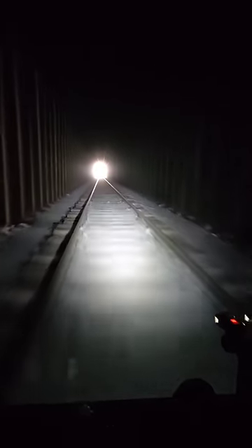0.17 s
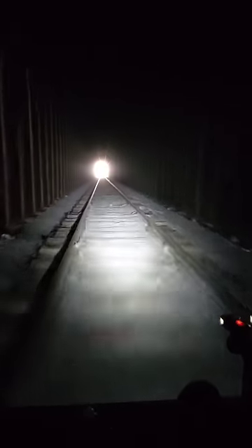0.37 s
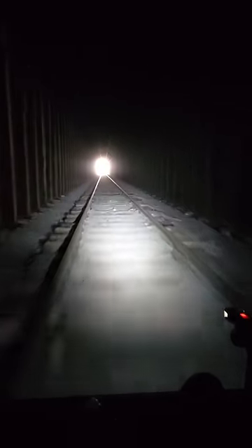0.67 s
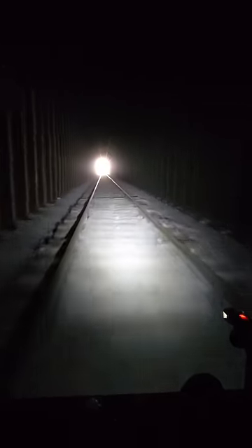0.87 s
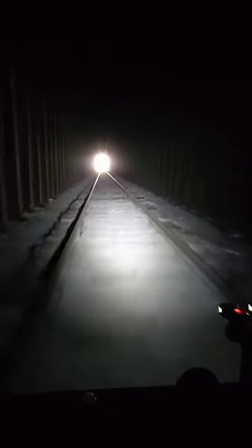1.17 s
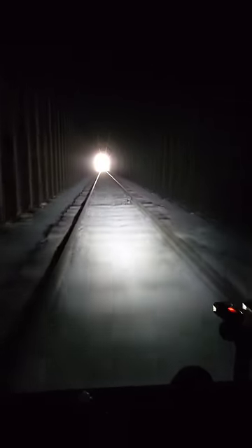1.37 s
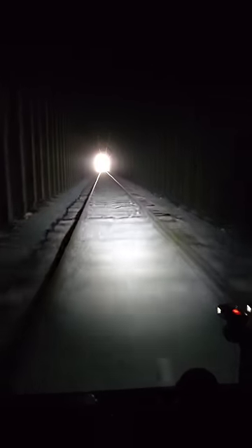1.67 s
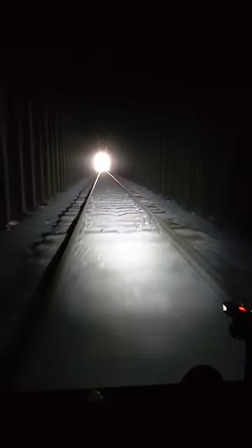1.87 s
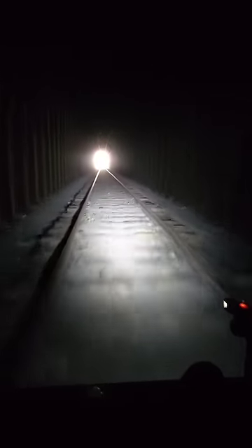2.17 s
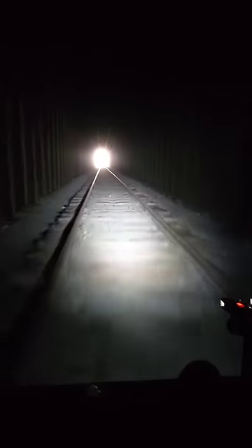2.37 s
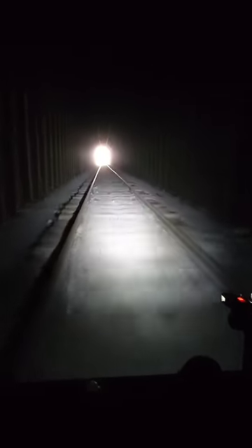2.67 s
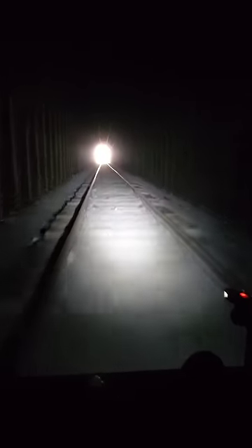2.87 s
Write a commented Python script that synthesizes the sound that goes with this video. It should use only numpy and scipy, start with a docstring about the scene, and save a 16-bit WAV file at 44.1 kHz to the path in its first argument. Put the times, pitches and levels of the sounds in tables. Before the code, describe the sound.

A small motorized rail cart rolls through a tunnel, heard from on board: pulsing steel-wheel roar, low uneven engine putter, and constant metal clacks, knocks and jingling rattle to the right, with brief hard echo.

```python
"""Rail cart in a tunnel

A small rail cart runs through a tunnel: uneven engine puffs ring an exhaust under a roar of steel wheels,
made of shaped noise that swells once a turn. To the right a loose metal piece hops: its modes ring while
it is in the air and are damped as it lands. The frame clacks, knocks and chatters in struck modes and grit,
low jolts thump through the chassis, and dying taps give the metal its tunnel echo. Wind flutters faintly.
"""
import sys
import numpy as np
from scipy import signal
from scipy.io import wavfile
from scipy.ndimage import uniform_filter1d

SR = 44100
rng = np.random.default_rng(int(sys.argv[2]) if len(sys.argv) > 2 else 0)


def put_to_file(sound):
    """Save the sound as 16-bit audio at rate SR, in the file named by the first command-line argument."""
    columns = np.atleast_2d(sound).T  # one column per channel
    safe = np.clip(columns, -1, 1)
    whole_steps = np.round(safe * 32767)
    wavfile.write(sys.argv[1], SR, whole_steps.astype(np.int16))


N = 133623

# Spectrum of the wheel roar, relative: [f/Hz, level per Hz/dB]
ROAR_SPECTRUM = [(15, -68), (25, -38), (59, -53), (99, -23), (141, 3.5), (326, -1), (476, -8.5), (624, -6),
                 (1160, -10.5), (2000, -9), (2910, -18.5), (3720, -21), (5000, -29), (8140, -28.5),
                 (10300, -39), (12200, -36.5), (14400, -30), (16000, -34)]
# Course of the roar above the rumble: [t/s, level/dB]
ROAR_LEVEL = [(0, -20), (.25, -20), (.5, -17), (.75, -18.5), (.95, -19.5), (1.1, -18.5), (1.3, -19.5),
              (1.5, -17.5), (1.75, -20), (1.95, -15.5), (2.1, -18.5), (2.3, -17), (2.55, -17), (2.75, -19),
              (3.03, -15)]
# Course of the low rumble, used relative to its loudest point: [t/s, level/dB]
RUMBLE_LEVEL = [(0, -22.5), (.3, -24.5), (.65, -21.5), (.9, -23), (1.2, -23), (1.6, -21), (1.9, -22),
                (2.05, -18.5), (2.25, -21), (2.4, -22), (2.75, -22.5), (3.03, -20.5)]
# Resonances the wheels add to the roar: [f/Hz, width/Hz, level/dB]
WHEEL_RING = [(611.4, 43, 1.5), (340.8, 10, -5)]
# Height of the swell once a wheel turn: [f/Hz, level/dB]
TURN_SWELL = [(100, -10.5), (300, 0.5), (700, 3), (2000, 4), (6000, 4), (12000, 0)]
# Likeness of the roar in the two ears: [f/Hz, correlation/share]
EAR_LIKENESS = [(60, .7), (120, .93), (300, .86), (700, .66), (1500, .45), (3000, .3), (6000, .2),
                (15000, .1)]
# Balance of the roar, left over right: [f/Hz, level/dB]
ROAR_BALANCE = [(60, -9), (110, 4), (200, 1), (380, 1), (700, -0.5), (1290, -1), (2380, -9), (4400, -3),
                (8120, -4), (15000, 4.5)]
# Band of the wind flutter: [low edge and high edge f/Hz]
WIND_BAND_HZ = [30, 95]
# Modes of the chattering frame: [f/Hz, level/dB, t60/s]
FRAME_MODES = [(1535, -6, .025), (1990, 0, .035), (2280, -3, .03), (2680, -6, .03), (3160, -4, .035),
               (3750, -1, .03), (4220, -3, .03), (4680, -11, .025), (5350, -17, .02), (6650, -14, .025),
               (7300, -18, .015), (8000, -10, .03), (9450, -16, .035)]
# How hard the frame chatters, relative: [t/s, level/dB]
CHATTER_COURSE = [(0, -5), (.17, -8), (.22, -1), (.31, -9), (.55, -4), (.61, 4), (.68, 1), (.72, -8),
                  (.93, -1), (.99, -10), (1.06, 3), (1.14, -8), (1.4, -1), (1.56, -11), (1.62, 1),
                  (1.77, -5), (1.81, 7), (1.9, 5), (1.93, -5), (2.07, -1), (2.3, -5), (2.44, 3), (2.5, -4),
                  (2.58, 1), (2.65, -8), (3.03, -2)]
# Exhaust resonances, each passed twice, the second time twice as wide: [f/Hz, width/Hz, level/dB]
EXHAUST = [(123.5, 9, 27), (143, 53, 0), (227, 31, 2), (264, 130, -4)]
# Course of the engine under load: [t/s, level/dB]
ENGINE_LEVEL = [(0, -30), (.4, -28.5), (.8, -26), (1.2, -25.5), (1.6, -30.5), (2, -20), (2.3, -17.5),
                (2.7, -26.5), (3.03, -20)]
# Clacks of the frame: [t/s, level/dB, f/Hz, bright ring level/dB, crack level/dB]
CLACKS = [(0.0433, -20, 3810, -10, -25), (0.375, -24, 3820, -1, -18), (0.5898, -18, 3750, -20, -2),
          (0.8086, -18, 3700, -3, -1), (0.8672, -10, 4140, -12, -14), (0.8745, -23, 4150, -15, -12),
          (0.915, -19, 4140, -20, -12), (0.9236, -22, 3700, -4, -13), (1.07, -31, 3700, -15, -5),
          (1.1784, -16.5, 3660, -1, 3.5), (1.2087, -22, 3700, -8, -3), (1.2492, -13, 3870, -7, -10),
          (1.3533, -15.5, 3710, -6, -6.5), (1.4092, -25, 3880, -40, -16), (1.4606, -19.5, 3680, -24, -11),
          (1.5209, -20.5, 3750, -4, 3), (1.6202, -18, 3730, -14, 1), (1.6826, -19, 3740, -8, -14),
          (1.767, -24, 3830, -14, -18), (1.8076, -19, 3750, -10, -1), (1.801, -30, 3600, -14, -6),
          (1.8385, -18, 3680, -14, -7), (1.86, -13.5, 4205, -16, -5), (1.8715, -24, 3750, -5, 6),
          (1.953, -15.5, 3860, -4, -19), (2.0076, -17, 3700, -4, -17), (2.1146, -11.5, 3790, -12, -24),
          (2.161, -15, 3640, 1.5, 1), (2.2204, -22.5, 3580, -16, 2), (2.3416, -16, 3900, -22, -19),
          (2.4533, -21, 3640, -12, -16), (2.4974, -15.5, 3870, -10, -16), (2.55, -17.5, 3640, 3, -15),
          (2.6054, -13.5, 3870, -10, -12), (2.6814, -19, 3640, -20, 6.5), (2.7706, -26, 3850, -13, -9),
          (2.8035, -21.5, 3830, -16, -16), (2.83, -12, 3820, -14, -3.5)]
# Close modes within a clack: [pitch/ratio, level/dB]
CLACK_CLUSTER = [(1, -1), (.965, -7), (1.04, -8), (1.11, -11)]
# Hops of the loose piece: [t/s, level/dB, time in the air/s, low modes level/dB, top modes level/dB]
HOPS = [(0.1898, -31.5, 0.02, 15, -28), (0.2387, -34, 0.088, 4, -20), (0.3271, -30, 0.034, 10, -9),
        (0.376, -34, 0.029, -15, -30), (0.4883, -28.5, 0.084, 8, -11), (0.5881, -29, 0.06, 2, -12),
        (0.638, -31, 0.022, -1, 1), (0.7871, -29.5, 0.032, -9, -17), (0.8657, -20, 0.022, 5, -7),
        (0.8905, -22, 0.036, -4, -4), (0.9245, -27.5, 0.0088, 0, -6), (1.0277, -31.5, 0.069, 11, -14),
        (1.076, -28.5, 0.014, 8, -12), (1.2597, -26.5, 0.03, 13, -3), (1.3533, -30.5, 0.02, -8, -6),
        (1.3848, -37, 0.035, 2, -1), (1.489, -32, 0.048, 14, -19), (1.5204, -34, 0.025, -19, 6),
        (1.59, -28.5, 0.033, 15.5, -6), (1.6816, -32, 0.063, -15, -14), (1.7135, -31.5, 0.052, 9, -15),
        (1.7926, -40, 0.066, 1, -12), (1.8087, -23, 0.018, 10, -3), (1.8275, -26, 0.02, 8, -8),
        (1.847, -27, 0.022, 9, -5), (1.8715, -27, 0.036, 1, -4), (1.954, -25, 0.021, 8, -1),
        (2.0294, -32, 0.03, 0, -11), (2.161, -28, 0.021, -19, -3), (2.372, -32.5, 0.072, 9, 0),
        (2.5347, -19.5, 0.015, 14, -5), (2.5516, -23.5, 0.015, -13, 1), (2.601, -25.5, 0.024, 12, -1),
        (2.7011, -19.5, 0.06, 10, -2), (2.8, -34, 0.04, 6, 0), (3.007, -28, 0.04, -22, -14)]
# Pitches of the loose piece's modes: [f/Hz]
PIECE_HZ = [3152, 4116, 4236, 5257, 5755, 6527, 6694, 7910, 8090, 9393, 10982, 11225, 4712]
# The same modes in order: [level/dB, t60/s, left over right/dB, group: 0 low, 1 middle, 2 top]
PIECE_MODES = [(-11, .08, -6, 0), (-6, .15, -8, 0), (-3, .1, -8, 0), (-12, .12, -4, 0), (-19, .15, -4, 0),
               (-7, .12, -2, 1), (-5, .18, -3, 1), (4, .6, -11, 1), (-6, .08, -4, 1), (0, .6, -11, 2),
               (-13, .4, -6, 2), (-13, .4, -6, 2), (-13, .1, -5, 0)]
# Dull knocks on the frame: [t/s, level/dB, f/Hz]
KNOCKS = [(0.256, -10, 1960), (0.3735, -12, 2100), (0.4743, -15.5, 2130), (0.602, -11, 1990),
          (0.6674, -15, 2030), (1.2476, -10, 2014), (1.3897, -11, 2025), (1.4132, -11.5, 2150),
          (1.4697, -9, 1955), (1.6315, -23, 2230), (1.6794, -11, 2020), (1.8821, -18, 2200),
          (1.8978, -28, 2220), (2.0098, -24, 1990), (1.908, -17, 2320), (2.3346, -12.5, 2040),
          (2.4, -14, 2060), (2.4407, -13, 1930), (2.4532, -13, 2480), (2.4948, -10, 2150),
          (2.541, -11.5, 2280), (2.9542, -25, 2110), (2.985, -11, 1930)]
# Jolts through the chassis: [t/s, level/dB, f/Hz]
THUMPS = [(0.445, -8.5, 345.6), (0.573, -14, 171), (0.681, -1.5, 140), (1.015, -9, 343), (1.399, -6.5, 156),
          (1.512, -4, 136), (1.735, -13, 150), (1.959, -7, 348.6), (2.009, -4, 257), (2.095, -4, 143),
          (2.221, -4, 158), (2.256, -13, 135), (2.979, -3, 132)]

TURN_HZ, FIRST_SWELL_S, SWELL_PEAK_S = 9.16, 0.043, 0.0071
RUMBLE_TOP_HZ, HISS_LOW_HZ = 480, 10500
HISS_RISE_DB, HISS_FOLLOW = 6, .2  # the hiss grows over the ride; share of the roar's course it follows
WIND_START_DB, WIND_RISE_DB = -59.25, 9.5
CHATTER_DB, CHATTER_PAN_DB, TICK_DB = -28, -16.5, -4
CHATTER_PER_S, CHATTER_SPREAD_DB = 1000, 3.2  # contact rate before clumping; spread of their strength
DETUNE, SPOT_SPREAD_DB = .022, 2.5  # from spot to spot: pitch share, mode level
ENGINE_HZ, FIRST_FIRING_S = 9.51, .025  # engine cycles per second; moment of a strong puff before wobble
WOBBLE, OFFBEAT, OFFBEAT_DB = 0.004, 0.49, -7  # timing drift and weak puff's place in cycles; its level
CLACK_T60, BRIGHT_HZ, BRIGHT_T60, CRACK_S = .04, 8280, .018, .0028
CRACK_DB, CLACK_PAN_DB = 3, -11
PIECE_DB, STRIKE_DB, STRIKE_SPREAD_DB = -1, -6, 2.5  # ring trim, grit trim, mode level spread
FLICKER_DB, LANDING_S = 2.5, 0.0022  # flicker of the ring; decay time as it lands
TOUCH_RISE = .007  # pitch share gained at the strike
TOUCH_S, TOUCH_SPREAD = .01, .9  # median time of touching the frame; its log spread
KNOCK_DB, KNOCK_T60, KNOCK_PAN_DB = -4.5, 0.041, -19
KNOCK_GRIT_DB, KNOCK_GRIT_S = 2, .006
THUMP_DB, THUMP_RISE_S, THUMP_T60 = -7, 0.0058, 0.14
TUNNEL_T60, TUNNEL_DB = .22, -13
LEFT_LATE_S = 0.000282
MIC_LOW_HZ, EDGE_HZ, KNEE = 109, 15850, 1.3  # bass cut, top of the band, ceiling of the rounded peaks


def gain_of(db):
    """Turn decibels into an amplitude factor."""
    return 10 ** (np.asarray(db) / 20)


def evened(x):
    """Scale to an RMS of one."""
    return x / np.sqrt(np.mean(x ** 2) + 1e-20)


def read(points, hz):
    """Read a curve along a logarithmic pitch axis."""
    f, value = np.transpose(points)
    return np.interp(np.log(hz + 1), np.log(f + 1), value)


def course(points, t):
    """Read a course over time, straight between its points."""
    return np.interp(t, *np.transpose(points))


def add(mix, s, sound):
    """Lay a sound into the mix from second s, cut at the end."""
    part = mix[..., round(s * SR):][..., :sound.shape[-1]]
    part += sound[..., :part.shape[-1]]


def resonate(x, hz, width):
    """A steady resonance with a gain of about one at its centre."""
    turn = np.exp(2j * np.pi * hz * np.arange(len(x)) / SR)
    r = np.exp(-np.pi * width / SR)
    return 2 * (turn * signal.lfilter([1 - r], [1, -r], x / turn)).real


def ping(t, hz, t60, turn=0):
    """A struck mode: a sine dying by 60 dB in t60, its phase offset in turns."""
    return gain_of(-60 * t / t60) * np.sin(2 * np.pi * (hz * t + turn))


def grit(noise, length_s):
    """A short crack of mid and treble noise with a hollow near 6 kHz."""
    sos = signal.butter(4, [1200, 9000], "band", fs=SR, output="sos")
    hollow = noise - .6 * resonate(noise, 6100, 600)
    return signal.sosfilt(sos, hollow) * np.exp(-np.arange(len(noise)) / SR / length_s)


def placed(x, pan_db):
    """A source to the right: weaker and later on the left."""
    late = round(LEFT_LATE_S * SR)
    left = np.r_[np.zeros(late), x][:len(x)]
    return np.array([gain_of(pan_db / 2) * left, gain_of(-pan_db / 2) * x])


def roar():
    """Rolling noise in drifting patches that swells once each wheel turn."""
    frames, hz = N // 256 + 5, np.fft.rfftfreq(1024, 1 / SR)
    a, b, c, d, patches = rng.standard_normal((frames, 513, 5)).T
    patches = uniform_filter1d(patches, size=12, axis=0)  # across pitch
    patches = evened(uniform_filter1d(patches, size=7, axis=1))  # across time
    flicker = evened(uniform_filter1d(rng.standard_normal(frames), size=2))

    t = np.arange(frames) * 256 / SR
    since = ((t - FIRST_SWELL_S) * TURN_HZ % 1) / TURN_HZ / SWELL_PEAK_S
    swell = since * np.exp(1 - since)
    level, rumble = course(ROAR_LEVEL, t), course(RUMBLE_LEVEL, t)
    top = level.max()
    low = 1 / (1 + (hz / RUMBLE_TOP_HZ) ** 4)
    hiss = hz > HISS_LOW_HZ
    follow = np.where(hiss, HISS_FOLLOW, 1 - low)

    db = read(ROAR_SPECTRUM, hz)[:, None] + np.outer(read(TURN_SWELL, hz), swell)
    db += np.outer(follow, level - top) + np.outer(low, rumble - rumble.max())
    db += 1.3 * patches + 0.72 * flicker
    db += np.outer(hiss, HISS_RISE_DB * (t * SR / N - 1))

    # the right ear shares part of the left's noise, a little earlier
    same = np.clip(read(EAR_LIKENESS, hz), 0, 1)[:, None]
    left = a + 1j * b
    earlier = np.exp(2j * np.pi * hz * LEFT_LATE_S)[:, None]
    right = same * left * earlier + np.sqrt(1 - same ** 2) * (c + 1j * d)
    balance = gain_of(read(ROAR_BALANCE, hz) / 2)[:, None]
    spectrum = np.array([left * balance, right / balance]) * gain_of(db)
    x = signal.istft(spectrum, nperseg=1024, noverlap=768)[1][:, :N]
    ring = [sum(gain_of(g) * resonate(ear, f, w) for f, w, g in WHEEL_RING) for ear in x]
    return gain_of(top - 1.5) * evened(x + np.array(ring))


def wind():
    """A faint low flutter that grows, unrelated at the two microphone ports."""
    sos = signal.butter(2, WIND_BAND_HZ, "band", fs=SR, output="sos")
    flutter = evened(signal.sosfilt(sos, rng.standard_normal((2, N))))
    return gain_of(WIND_START_DB + WIND_RISE_DB * np.arange(N) / N) * flutter


def chatter():
    """Many tiny contacts, in clumps: each ticks and rings one of twelve slightly different frame spots."""
    shake = gain_of(course(CHATTER_COURSE, np.arange(N) / SR))
    clump = gain_of(3.0 * evened(uniform_filter1d(rng.standard_normal(N), size=700)))
    strength = gain_of(CHATTER_SPREAD_DB * np.minimum(rng.exponential(1, N), 3))
    contacts = strength * (rng.random(N) < CHATTER_PER_S * clump / SR)
    spot, t, x = rng.integers(0, 12, N), np.arange(2000) / SR, np.zeros(N)
    spot_draws = rng.standard_normal((12, len(FRAME_MODES), 2))
    for k, (draws, noise) in enumerate(zip(spot_draws, rng.standard_normal((12, 2000)))):
        sound = gain_of(TICK_DB) * grit(noise, 0.00098)
        for (hz, db, t60), (u, v) in zip(FRAME_MODES, draws):
            sound += gain_of(db + SPOT_SPREAD_DB * u) * ping(t, hz * (1 + DETUNE * v), t60)
        x += signal.oaconvolve(contacts * (spot == k), sound)[:N]
    return placed(gain_of(CHATTER_DB) * shake * evened(x), CHATTER_PAN_DB)


def engine():
    """One strong and one weak puff each cycle ring the exhaust."""
    t = np.arange(N) / SR
    drift = evened(uniform_filter1d(rng.standard_normal(N), size=4000))
    cycles = (t - FIRST_FIRING_S) * ENGINE_HZ + WOBBLE * drift
    puffs = np.zeros(N)
    for offset, gain in [(0, 1), (OFFBEAT, gain_of(OFFBEAT_DB))]:
        puffs += gain * (np.diff(np.floor(cycles - offset), prepend=-1) > 0)
    puffs = puffs * gain_of(2.5 * rng.standard_normal(N))  # uneven strength
    x = sum(gain_of(db) * resonate(resonate(puffs, f, w), f, 2 * w) for f, w, db in EXHAUST)
    return gain_of(course(ENGINE_LEVEL, t)) * evened(x)


def clacks():
    """A crack of noise, a short ring of close modes and a brighter, shorter one."""
    out, t = np.zeros(N), np.arange(3000) / SR
    noises = rng.standard_normal((len(CLACKS), 3000))
    for (s, db, hz, bright_db, crack_db), noise in zip(CLACKS, noises):
        modes = zip(CLACK_CLUSTER, noise[-4:])  # the last draws set the phases
        ring = sum(gain_of(g) * ping(t, hz * ratio, CLACK_T60, turn) for (ratio, g), turn in modes)
        bright = gain_of(bright_db) * ping(t, BRIGHT_HZ, BRIGHT_T60)
        crack = gain_of(crack_db + CRACK_DB) * grit(noise, CRACK_S)
        add(out, s, gain_of(db) * (np.minimum(t / 0.00087, 1) * ring + bright + crack))
    return placed(out, CLACK_PAN_DB)


def loose_piece():
    """Each hop strikes the modes anew: sharp until the piece lifts off, flickering, cut by the landing."""
    out, chance = np.zeros((2, N)), rng.standard_normal((len(HOPS), len(PIECE_MODES), 3))
    tremble = uniform_filter1d(rng.standard_normal((len(PIECE_MODES), N + SR)), size=110)
    tremble = gain_of(FLICKER_DB * evened(tremble))
    noises = rng.standard_normal((len(HOPS), 1500))
    for (s, db, air, low_db, top_db), draws, noise in zip(HOPS, chance, noises):
        t = np.arange(0, air + 5 * LANDING_S, 1 / SR)
        gate = np.minimum(t / 0.0019, 1) * np.exp(-np.maximum(t - air, 0) / LANDING_S)
        touch = TOUCH_S * np.exp(TOUCH_SPREAD * noise[0])
        ahead = TOUCH_RISE * touch * (1 - np.exp(-t / touch))  # seconds of phase gained by the raised pitch
        add(out, s, placed(gain_of(db + STRIKE_DB) * grit(noise, 0.0036), CLACK_PAN_DB))
        for hz, mode, (u, left_turn, right_turn), shake in zip(PIECE_HZ, PIECE_MODES, draws, tremble):
            mode_db, t60, pan_db, group = mode
            group_db = (low_db, 0, top_db)[round(group)]
            gain = gain_of(PIECE_DB + db + mode_db + group_db + STRIKE_SPREAD_DB * u)
            envelope = gain * gate * shake[round(s * SR):][:len(t)]
            left = gain_of(pan_db) * ping(t, hz, t60, left_turn + hz * ahead)
            right = ping(t, hz, t60, right_turn + hz * ahead)
            add(out, s, envelope * np.array([left, right]))
    return out


def knocks():
    """Duller blows on the frame: a cluster of modes and a crackle."""
    out, t = np.zeros(N), np.arange(3000) / SR
    dull = signal.butter(2, [900, 3500], "band", fs=SR, output="sos")
    turns = rng.random((len(KNOCKS), 2))
    noises = rng.standard_normal((len(KNOCKS), 3000))
    for (s, db, hz), (a, b), noise in zip(KNOCKS, turns, noises):
        crackle = gain_of(KNOCK_GRIT_DB) * signal.sosfilt(dull, noise) * np.exp(-t / KNOCK_GRIT_S)
        side_modes = ping(t, 1.4 * hz, 0.024, a) + ping(t, .72 * hz, 0.029, b)
        blow = .8 * ping(t, hz, KNOCK_T60) + .45 * side_modes + crackle
        add(out, s, gain_of(db + KNOCK_DB) * np.minimum(t / 0.00071, 1) * blow)
    return placed(out, KNOCK_PAN_DB)


def thumps():
    """Low jolts of two modes with a soft onset, heard alike in both ears."""
    out, t = np.zeros(N), np.arange(6000) / SR
    for s, db, hz in THUMPS:
        modes = ping(t, hz, THUMP_T60) + .4 * ping(t, 2.1 * hz, 0.16)
        add(out, s, gain_of(db + THUMP_DB) * np.minimum(t / THUMP_RISE_S, 1) * modes)
    return out


def tunnel(x):
    """Sparse dying taps of random sign, other ones for each ear."""
    t = np.arange(SR // 4) / SR
    signs = rng.choice([-1., 1.], (2, len(t)))
    sparse = (rng.random((2, len(t))) < .05) * (t > .003)
    taps = signs * sparse * gain_of(-60 * t / TUNNEL_T60)
    return gain_of(TUNNEL_DB) * signal.fftconvolve(x, taps / np.linalg.norm(taps[0]), axes=1)[:, :N]


def scene():
    """Sum the sources; only the rattling metal feeds the tunnel echo."""
    metal = loose_piece() + clacks() + knocks() + chatter()
    return roar() + engine() + thumps() + metal + tunnel(metal)


def record(dry):
    """The microphone drops the deep bass and hears wind; peaks are rounded; then the band limit."""
    bass_cut = signal.butter(4, MIC_LOW_HZ, "high", fs=SR, output="sos")
    thin = signal.sosfilt(bass_cut, dry) + wind()
    rounded = KNEE * np.tanh(thin / KNEE)
    band_limit = signal.firwin(511, EDGE_HZ, window=("kaiser", 9), fs=SR)
    return signal.oaconvolve(rounded, band_limit[None], "same")


dry = scene()
out = record(dry)
put_to_file(out)
```